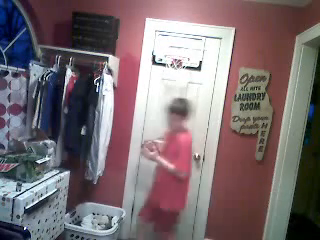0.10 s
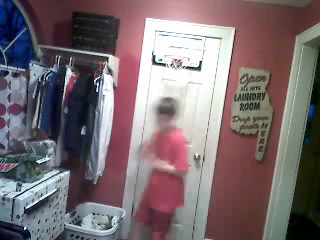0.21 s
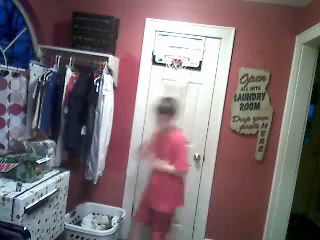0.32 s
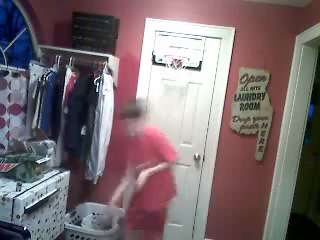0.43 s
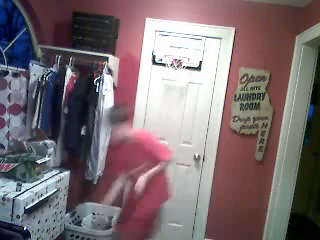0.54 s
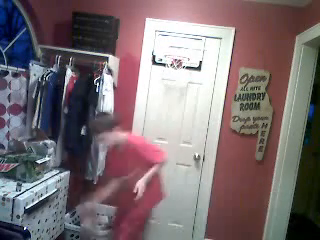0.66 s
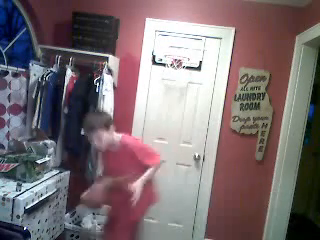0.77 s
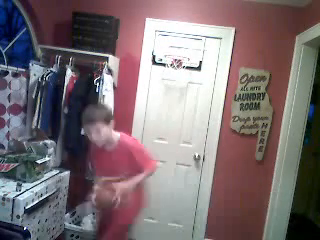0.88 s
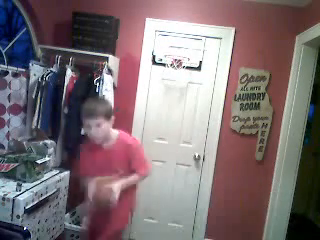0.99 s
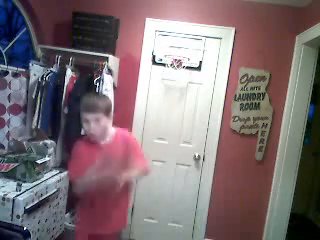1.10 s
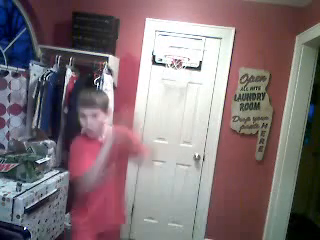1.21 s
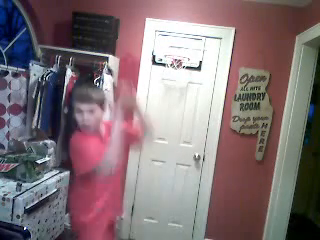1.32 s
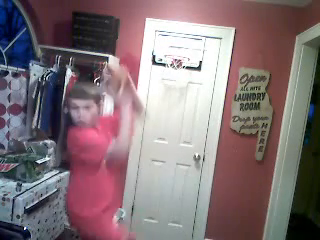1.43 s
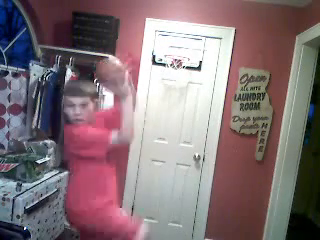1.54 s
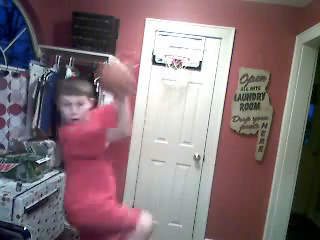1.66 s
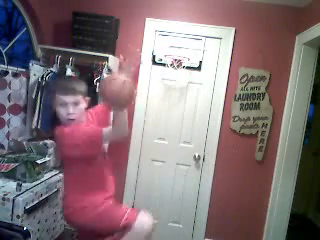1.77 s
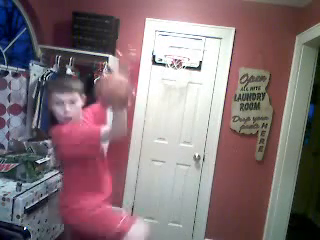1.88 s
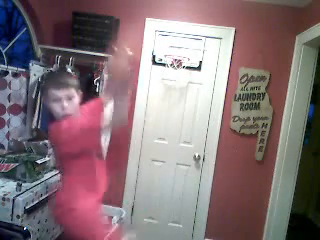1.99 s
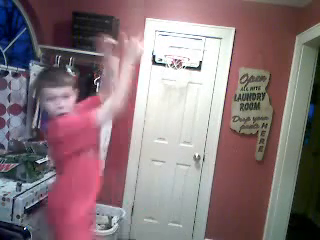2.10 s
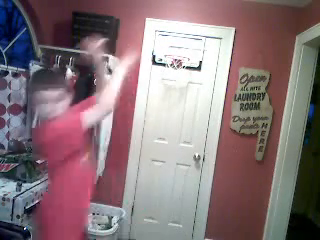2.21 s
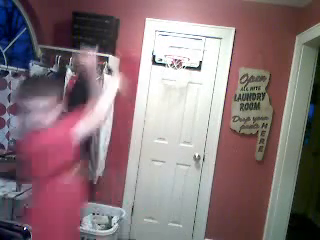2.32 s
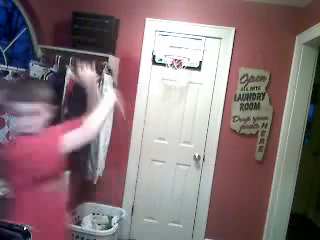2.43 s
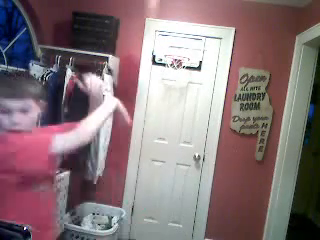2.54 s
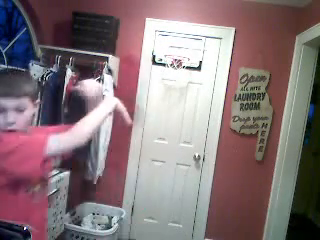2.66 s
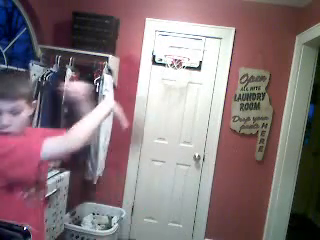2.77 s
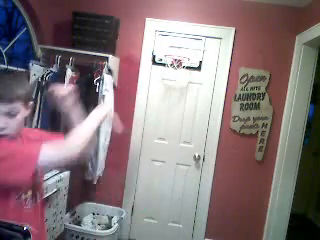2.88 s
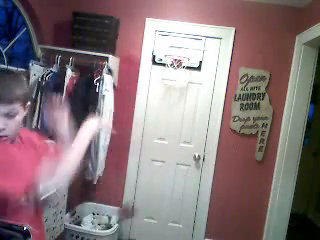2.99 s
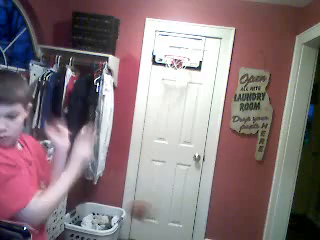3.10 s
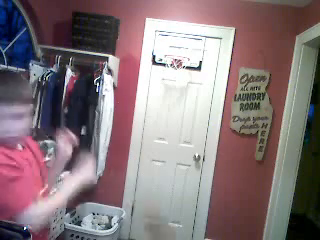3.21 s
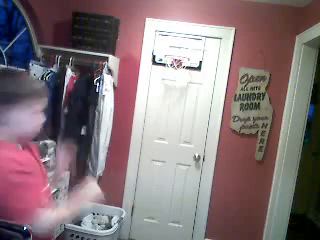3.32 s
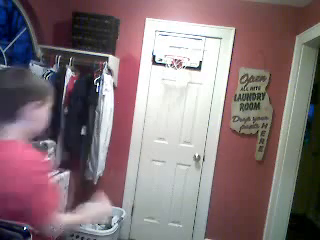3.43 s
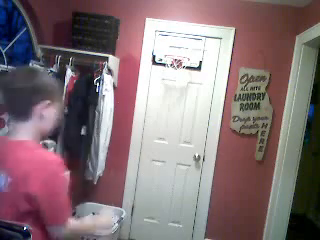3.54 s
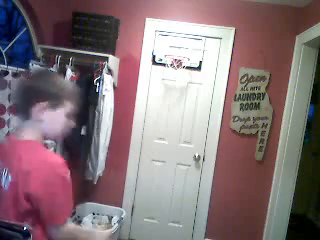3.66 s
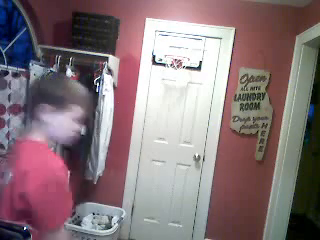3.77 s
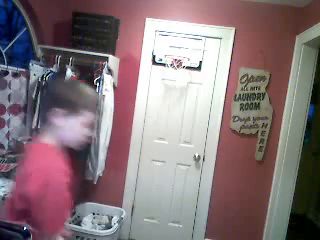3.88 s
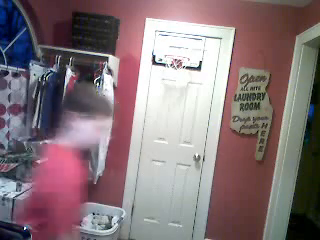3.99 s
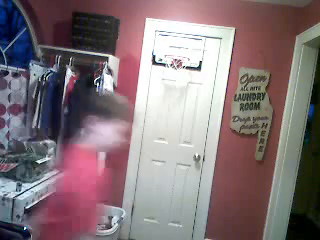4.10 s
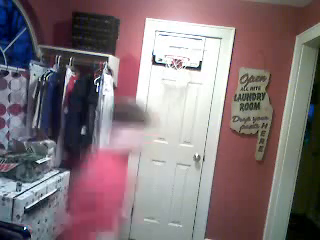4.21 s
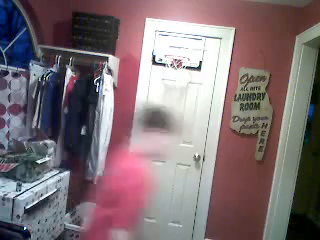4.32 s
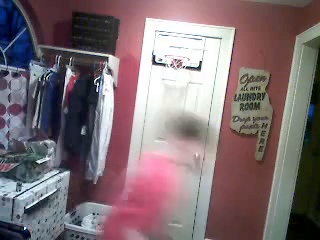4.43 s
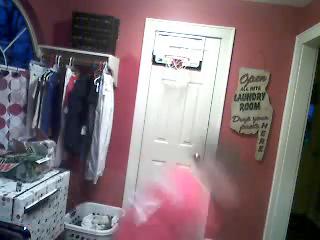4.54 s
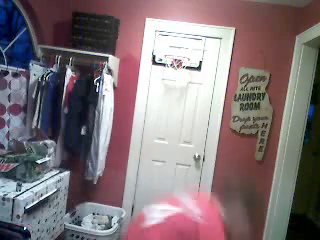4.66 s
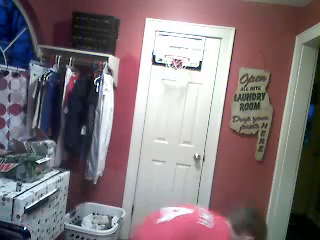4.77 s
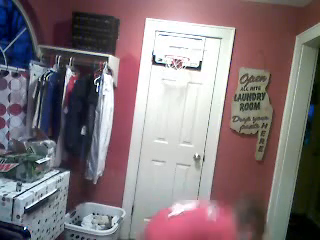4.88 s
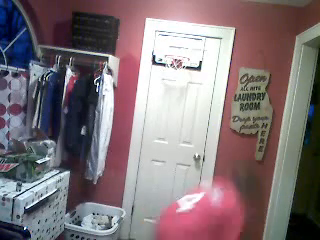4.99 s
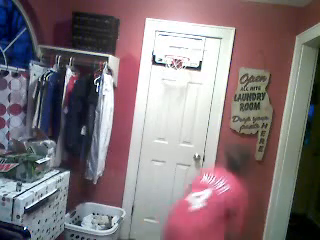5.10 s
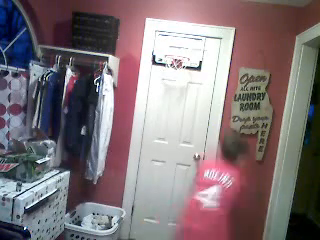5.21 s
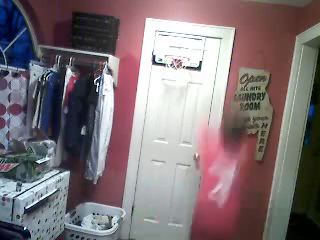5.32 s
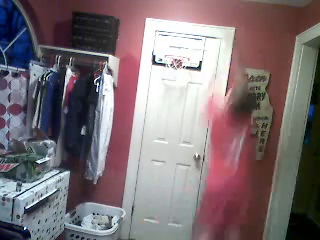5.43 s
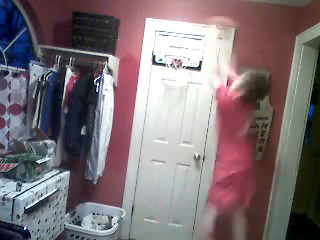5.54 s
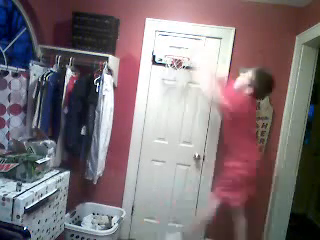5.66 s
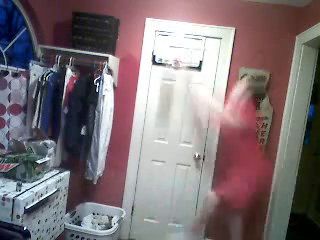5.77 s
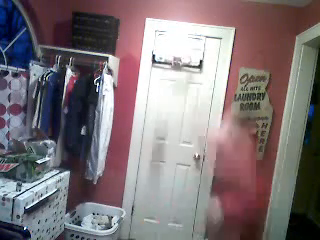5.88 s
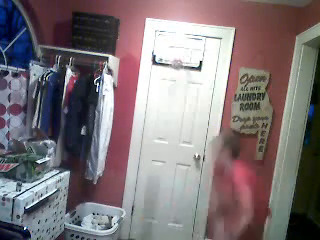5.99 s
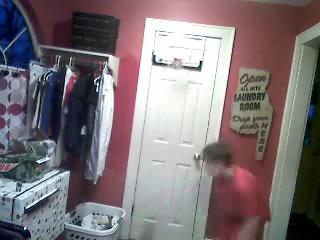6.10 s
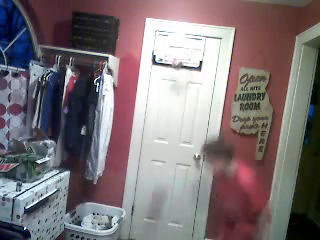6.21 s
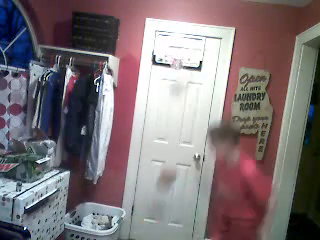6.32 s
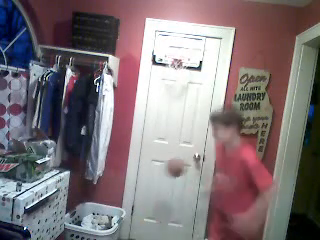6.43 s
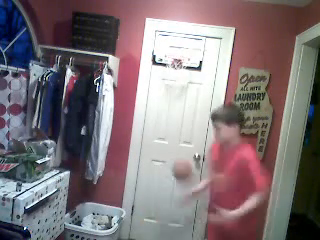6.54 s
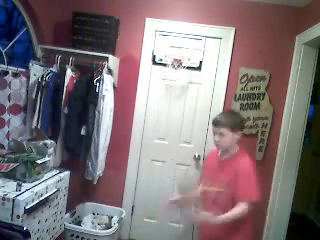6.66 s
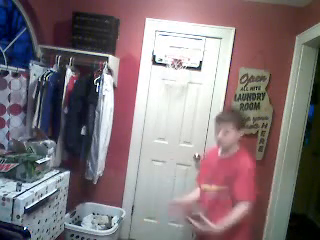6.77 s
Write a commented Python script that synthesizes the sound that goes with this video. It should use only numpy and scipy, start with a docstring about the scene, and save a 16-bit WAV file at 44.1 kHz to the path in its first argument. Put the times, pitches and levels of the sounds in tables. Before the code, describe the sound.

A small, hard, lively room with a wooden floor, heard through a cheap fixed microphone with faint hiss and mains hum. A low footfall comes at 0.3 s, and a rubber ball slaps with a round thump at about 0.5 s. A soft foot thud follows at 0.85 s, then relative quiet until light knocks at 2.3 s and bounces at 2.8 and 2.95 s. Around 3.45 s a rapid cluster of heavy blows hits a sheet-metal appliance: loud bang, hollow ping, harsh rattle, and a deep boom lingering over a second. Footfalls and duller bounces continue from 3.7 to 4.85 s, with slight cloth rustle near 4.1 and 5.4 s. From 5.7 s a mini hoop shakes, board and loose parts clattering, door swaying, rim squeaking briefly upward at 5.9 s; a strong hit lands at 6.07 s. Rattling and footfalls thin out to tiny ticks by 6.8 s.

```python
"""Small hard room, wooden floor: steady microphone hiss (coloured noise) and mains hum (sine); feet thud throughout.
From 0.4 s a small rubber ball slaps floor and hands: noise bursts over dying floor and room modes.
At 3.45 s it bangs a sheet-metal appliance, whose panel modes boom on; more bounces follow.
From 5.7 s it shakes a mini hoop: board and loose panels rattle (trains of knocks through modes), a door sways,
loose parts chatter in random clicks, the rim squeaks in gliding partials, and the rattle dies away."""
import sys
import numpy as np
from scipy import signal
from scipy.fft import rfft, irfft, next_fast_len
from scipy.io import wavfile
from scipy.ndimage import uniform_filter1d

SR = 44100
rng = np.random.default_rng(int(sys.argv[2]) if len(sys.argv) > 2 else 0)


def makeup_ratio(level_db):
    """Linear amplitude ratio for a level in decibels (20 dB per factor of ten)."""
    decades = np.asarray(level_db, float) / 20
    return 10 ** decades


def inscribe(sig):
    """Save sig as 16-bit PCM at rate SR to the path in sys.argv[1].

    A 1-D sig is mono; a 2-D sig holds one channel per row.
    Samples are clipped to [-1, 1] before scaling.
    """
    pcm = np.round(np.clip(np.atleast_2d(sig).T, -1, 1) * 32767)
    wavfile.write(sys.argv[1], SR, pcm.astype(np.int16))


N = 302526


def evened(x):
    """Scales to rms 1."""
    return x / np.sqrt(np.mean(x ** 2) + 1e-20)


def add(mix, time_s, sound):
    """Mixes a sound in at time_s."""
    part = mix[round(time_s * SR):][:len(sound)]
    part += sound[:len(part)]


def coloured(x, points):
    """Filters x by a spectrum of (frequency [Hz], gain [dB])."""
    size = next_fast_len(len(x))
    hz, db = np.transpose(points)
    bins_hz = np.fft.rfftfreq(size, 1 / SR)
    gain = makeup_ratio(np.interp(np.log(bins_hz + 1), np.log(hz + 1), db))
    return irfft(rfft(x, size) * gain, size)[:len(x)]


def like_strength(ring):
    """Scales by the energy of the first 45 ms."""
    return ring / np.sqrt(np.mean(ring[:2000] ** 2) * 6)


def struck(modes, rise_s, smear, count=4, size=22000):
    """Dying modes after a soft blow; with count > 1 each is a crowd of close neighbours that beat and blur."""
    hz, db, t60_s = np.repeat(np.transpose(modes), count, axis=1)[:, :, None]
    detune = 1 + smear * rng.standard_normal((len(hz), 1))
    phase = rng.random((len(hz), 1)) * (count > 1)  # lone modes all start with the push
    t = np.arange(0, size, 4) / SR  # low modes: a quarter rate suffices
    ring = makeup_ratio(db - 60 * t / t60_s) * np.sin(2 * np.pi * (hz * detune * t + phase))
    ring = ring.sum(0) * (1 - np.exp(-(t / rise_s) ** 2))
    return like_strength(signal.resample_poly(ring, 4, 1))


def puff(points, t60_s, rise_s):
    """A short burst of coloured noise, peak near 1."""
    t = np.arange(8000) / SR
    noise = evened(coloured(rng.standard_normal(len(t)), points))
    return noise * makeup_ratio(-60 * t / t60_s) * (1 - np.exp(-t / rise_s))


def chime(hz, glide_hz_per_s, t60_s):
    """Six close partials that beat and die, gliding in pitch if asked."""
    t = np.arange(12000) / SR
    detune, phase = 1 + 0.028 * rng.standard_normal((6, 1)), rng.random((6, 1))
    turns = hz * detune * t + glide_hz_per_s * t ** 2 / 2 + phase
    ring = np.sin(2 * np.pi * turns).sum(0)
    return like_strength(ring * makeup_ratio(-60 * t / t60_s) * (1 - np.exp(-t / 0.006)))


def shaking(hold_s, t60_s):
    """Envelope of a jolt: quick rise, hold, then dying away."""
    t = np.arange(16000) / SR
    rise = 1 - np.exp(-t / 0.005)
    return rise * makeup_ratio(-60 * np.maximum(t - hold_s, 0) / t60_s)


# hiss spectrum: (frequency [Hz], relative density [dB per Hz])
HISS_SPECTRUM = [(15, -2), (30, 8), (90, -1.5), (300, -7), (500, -10.5), (1500, -17), (5000, -22),
                 (9000, -23.5), (10500, -34), (13000, -32)]
HISS_RMS_DB = -70


def hiss():
    """Microphone hiss: steady coloured noise."""
    return makeup_ratio(HISS_RMS_DB) * evened(coloured(rng.standard_normal(N), HISS_SPECTRUM))


# mains hum: (frequency [Hz], level [dB rms])
MAINS = (59.8, -70)


def hum():
    """Mains hum: one steady sine."""
    hz, rms_db = MAINS
    return makeup_ratio(rms_db) * np.sqrt(2) * np.sin(2 * np.pi * (hz * np.arange(N) / SR + rng.random()))


# room decay: (frequency [Hz], t60 [s])
ROOM_DECAY = [(100, 0.48), (500, 0.44), (1500, 0.45), (5000, 0.37), (10000, 0.35)]


def room(x):
    """Three tails of sparse random taps, each band dying at its own speed; the source drifts among them."""
    at = np.arange(200, SR // 2 - 20, 20)
    at = at + rng.integers(0, 20, (3, len(at)))
    taps = np.zeros((3, SR // 2))
    np.put_along_axis(taps, at, rng.choice([-1., 1.], at.shape), 1)
    hz, t, bands = signal.stft(taps, SR, nperseg=512)
    decay_hz, decay_s = np.transpose(ROOM_DECAY)
    t60_s = np.interp(np.log(hz + 1), np.log(decay_hz), decay_s)[:, None]
    tails = signal.istft(bands * makeup_ratio(-60 * t / t60_s), SR, nperseg=512)[1]
    tails = tails / np.linalg.norm(tails[0])
    turn = 2 * np.pi * (7 * np.arange(N) / SR + np.arange(3)[:, None] / 3)  # 7 Hz, three phases
    wet = signal.fftconvolve(x * np.cos(turn) * np.sqrt(2 / 3), tails, axes=1).sum(0)[:N]
    return signal.lfilter(*signal.butter(2, 250, "high", fs=SR), wet)  # the lowest modes ring in the tables


# cloth brushing: (time [s], level [dB])
RUSTLES = [(4.11, -66.5), (5.41, -70)]


def cloth():
    """Cloth rustles: soft-edged puffs of noise."""
    out = np.zeros(N)
    for time_s, db in RUSTLES:
        add(out, time_s, makeup_ratio(db) * puff([(800, -16), (2800, -3), (7500, -5), (11000, -15.5)], 0.37, 0.03))
    return out


# footfalls: (time [s], level [dB], pitch [Hz], t60 [s])
FOOTFALLS = [(0.276, -39.5, 61.4, 0.14), (0.33, -50, 55, 0.18), (0.851, -42.5, 68.6, 0.11),
             (2.258, -55, 164, 0.23), (2.398, -48.5, 55.5, 0.4), (2.47, -48, 34.2, 0.35),
             (2.83, -38.5, 35, .5), (3.718, -29.5, 140, 0.13), (4.099, -34, 119, .2),
             (4.51, -38.5, 56, 0.25), (4.774, -38, 46, 0.13), (5.218, -55, 145.2, 0.21),
             (5.4, -52.5, 32.6, .2), (6.261, -36, 65.4, 0.24), (6.427, -42, 32.8, 0.42),
             (6.599, -44, 48, 0.31)]
# board modes under a foot: (multiple of the pitch [ratio], level [dB])
FOOT_MODES = [(1, 0), (1.3, -7), (1.8, -14)]
SCUFF_DB, SCUFF_LATE_S = -18.5, 0.015  # re thud


def feet():
    """Each footfall pushes the boards at one low pitch and scuffs a little."""
    out = np.zeros(N)
    scuff = [(150, 1), (350, -2.5), (1100, -11.5), (1600, -23), (9000, -30), (11000, -72)]  # (Hz, dB)
    for time_s, db, hz, t60_s in FOOTFALLS:
        modes = [(hz * ratio, mode_db, t60_s) for ratio, mode_db in FOOT_MODES]
        add(out, time_s, makeup_ratio(db) * struck(modes, 0.011, 0.012, count=1))
        add(out, time_s + SCUFF_LATE_S, makeup_ratio(db + SCUFF_DB) * puff(scuff, 0.22, 0.0067))
    return out


# door leaf resonances: (frequency [Hz], width [Hz], level [dB])
LEAF_MODES = [(30, 27, 0.5), (45, 37, -6.5), (66, 110, -3)]
# door swaying on its latch: (time [s], level [dB])
SWAY_LEVEL = [(5.67, -46.5), (5.804, -33), (6.034, -37.5), (6.086, -26), (6.162, -47.5), (6.258, -33.5),
              (6.52, -59.5), (6.622, -56), (6.85, -75)]


def door():
    """The door leaf sways: noise through low double resonators, under a level curve."""
    push = rng.standard_normal(N)
    sway = np.zeros(N)
    for hz, width_hz, db in LEAF_MODES:
        r = np.exp(-np.pi * width_hz / SR)
        poles = [1, -2 * r * np.cos(2 * np.pi * hz / SR), r * r]
        once = signal.lfilter([1, -1], poles, push)
        sway += makeup_ratio(db) * evened(signal.lfilter([1, -1], poles, once))
    time_s, sway_db = np.transpose(SWAY_LEVEL)
    curve_db = np.interp(np.arange(N) / SR, time_s, sway_db, -120, -120)
    return uniform_filter1d(makeup_ratio(curve_db), size=400) * evened(sway)


# jolts, also played by jolt_ticks() and rattle():
# (time [s], rattle level [dB], hold [s], upper re lower modes [dB], chatter level [dB])
JOLTS = [(0.889, -63.5, 0.0064, 13, -62), (2.35, -54, 0.0056, -8, -66), (3.452, -36.5, 0.034, 2, -59),
         (3.505, -29.5, 0.032, 4, -38.5), (3.545, -31, 0.031, 0.5, -47), (4.844, -62.5, 0.0092, -17, -64),
         (5.687, -35, 0.039, 3.5, -41.5), (5.762, -30, 0.02, -5.5, -44), (5.796, -32, 0.025, -7, -44),
         (5.847, -52, 0.027, 0, -51), (5.9, -50, 0.013, 1, -48), (5.945, -37, 0.034, -3.5, -55),
         (5.985, -35.5, 0.02, 2.5, -44.5), (6.078, -36, 0.021, -7.5, -71), (6.122, -37, 0.022, -6.5, -52),
         (6.171, -53.5, 0.067, 2, -71), (6.21, -34.5, 0.012, 2.5, -53), (6.222, -33.5, 0.016, -10, -56),
         (6.265, -46.5, 0.029, -5, -54), (6.335, -42, 0.0075, -1, -61.5), (6.385, -56, 0.012, -12, -79),
         (6.462, -56.5, 0.018, -5, -77), (6.444, -71, 0.026, 8, -72), (6.563, -62, 0.013, -6, -79),
         (6.592, -49.5, 0.0059, -7, -75), (6.68, -63, 0.024, -10, -72.5), (6.745, -73.5, 0.13, 0, -80.5)]
CHATTER_T60_S, BRIGHT_DB, CLICKS_PER_S = 0.19, -8.0, 1500


def chatter():
    """After each jolt loose parts chatter in dense, clumped random clicks, dull and bright."""
    size_db = 2.0 * np.minimum(rng.exponential(1, (2, N)), 5)
    clump_db = 1.6 * evened(uniform_filter1d(rng.standard_normal(N), size=500))
    hits = (rng.random((2, N)) < CLICKS_PER_S / SR) * rng.choice([-1, 1], (2, N))
    clicks = hits * makeup_ratio(size_db + clump_db)
    dull = evened(coloured(clicks[0], [(900, -26), (1600, 0), (4400, -7), (5200, -3.5), (13000, -26.5)]))
    bright = evened(coloured(clicks[1], [(3500, -20.5), (5000, -13), (8000, 6.5), (10000, -5), (13000, -16)]))
    power = np.zeros(N)
    for time_s, _, hold_s, _, chatter_db in JOLTS:
        add(power, time_s, (makeup_ratio(chatter_db) * shaking(hold_s, CHATTER_T60_S)) ** 2)
    return np.sqrt(power) * (dull + makeup_ratio(BRIGHT_DB) * bright)


# jolt tick spectrum: (frequency [Hz], relative density [dB per Hz])
JOLT_TICK_SPECTRUM = [(400, -22.5), (1200, -6), (1700, -0.5), (2400, -8), (5000, -10), (11000, -22)]
JOLT_TICK_DB, JOLT_TICK_LATE_S = 1, 0.003  # re chatter level and jolt


def jolt_ticks():
    """Loose parts tick at each jolt: a noise puff."""
    out = np.zeros(N)
    for time_s, _, _, _, chatter_db in JOLTS:
        tick = puff(JOLT_TICK_SPECTRUM, 0.093, 0.006)
        add(out, time_s + JOLT_TICK_LATE_S, makeup_ratio(chatter_db + JOLT_TICK_DB) * tick)
    return out


# pitched ticks of small hard parts: (time [s], level [dB], pitch [Hz])
TICKS = [(0.403, -56.5, 2510), (0.893, -56.5, 2580), (2.35, -55.5, 5200), (2.352, -58, 3240),
         (3.507, -30.5, 6760), (4.083, -56, 3050), (5.807, -35.5, 3140), (5.979, -46, 5600),
         (6.075, -29.5, 6960), (6.34, -71, 4500), (6.445, -68, 3480), (6.601, -72, 3900), (6.69, -72, 2700),
         (6.744, -69, 2900), (6.775, -74, 4340), (6.83, -75, 3300)]


def ticks():
    """Short puffs of noise gathered round one pitch."""
    out = np.zeros(N)
    for time_s, db, hz in TICKS:
        peak = [(hz * 0.2, -30), (hz * 0.75, -13), (hz, 0), (hz * 1.5, -13), (hz * 4.9, -28)]
        add(out, time_s, makeup_ratio(db) * puff(peak, 0.12, 0.0019))
    return out


# hollow parts that ring at one pitch: (time [s], level [dB], pitch [Hz])
PINGS = [(0.404, -60, 1185), (2.345, -48.5, 865), (2.345, -65, 1620), (2.803, -57.5, 993),
         (3.507, -24, 1120), (6.685, -59, 768)]


def pings():
    """Hollow parts ring in close partials that beat and die."""
    out = np.zeros(N)
    for time_s, db, hz in PINGS:
        add(out, time_s, makeup_ratio(db) * chime(hz, 0, t60_s=0.2))
    return out


# squeaks of the springy rim: (time [s], level [dB], start pitch [Hz], glide [Hz per s])
SQUEAKS = [(5.901, -47, 4180, 1970), (5.978, -58, 5550, 9200)]


def squeaks():
    """The springy rim squeaks: short clusters of partials gliding upward."""
    out = np.zeros(N)
    for time_s, db, hz, glide_hz_per_s in SQUEAKS:
        add(out, time_s, makeup_ratio(db) * chime(hz, glide_hz_per_s, t60_s=0.088))
    return out


# lower modes of board and panels: (frequency [Hz], level [dB], t60 [s])
RATTLE_LOW = [(564, -15, 0.011), (600.4, -3.5, 0.076), (664, -0.5, 0.046), (710, 3, 0.021),
              (790.6, -5.5, 0.026)]
# upper modes of board and panels: (frequency [Hz], level [dB], t60 [s])
RATTLE_HIGH = [(989, 1.5, 0.056), (1026, -2.5, 0.073), (1099.7, -4.5, 0.16), (1163.5, -4, 0.025),
               (1283, -9.5, 0.022), (1496, -12, 0.035), (1746, -20, 0.03)]
RATTLE_PER_S, RATTLE_T60_S, LEAD_DB = 130, 0.1, 1.5


def rattle():
    """At each jolt the board or loose panels knock hard, then many times more, ringing in two mode clusters."""
    out = np.zeros(N)
    for time_s, db, hold_s, upper_db, _ in JOLTS:
        shake = shaking(hold_s, RATTLE_T60_S)
        clusters = (RATTLE_LOW, -upper_db / 2), (RATTLE_HIGH, upper_db / 2)
        for modes, side_db in clusters * 2:  # two spots of contact
            place = (np.arange(100) + rng.random(100)) * SR / RATTLE_PER_S
            strength = makeup_ratio(2.13 * rng.standard_normal(100))
            knocks = np.bincount(place.astype(int), strength, 16000)[:len(shake)] * shake
            knocks[150] += makeup_ratio(LEAD_DB)  # the hard knock, 3.4 ms in
            ring = struck(modes, 0.00086, 0.05, count=3, size=6000)
            ring = ring / np.linalg.norm(ring) * np.sqrt(SR / RATTLE_PER_S / 4)
            add(out, time_s, makeup_ratio(db + side_db) * signal.fftconvolve(knocks, ring))
    return out


# sheet-metal side modes: (frequency [Hz], level [dB], t60 [s])
PANEL_MODES = [(33.4, -4.5, 1.1), (63.2, 2.5, 0.93), (109, -9.5, 0.52), (122.7, 0, 1.2), (140, -13.5, 2.3),
               (169.4, -3.5, 0.4), (220.2, -9.5, 1.6), (247, 2, 0.76), (271, -5.5, 0.75), (322.6, -11, 1.3),
               (389, -16, 1.1), (450, -16.5, 0.78), (518, -6.5, 0.86), (667, -19, 0.56), (734, -16.5, 1.3),
               (833, -21, 0.76), (922, -15, 0.892), (1175, -14, 0.59), (1300, -24.5, 0.93)]
PANEL_S, PANEL_DB = 3.452, -18.5


def sheet_metal():
    """The appliance's side booms on after a hard blow: long, blurred modes."""
    out = np.zeros(N)
    add(out, PANEL_S, makeup_ratio(PANEL_DB) * struck(PANEL_MODES, 0.016, 0.09, count=14, size=60000))
    return out


# ball blows: (time [s], slap [dB], deep boom [dB], floor drum [dB], ring [dB])
BLOWS = [(0.396, -53, -55, -60, -65), (0.5186, -33, -28, -25.5, -34.5), (0.8928, -76, -55, -58, -56),
         (2.3377, -64, -38, -41.5, -55), (2.8025, -49.5, -37, -38.5, -49.5),
         (2.9631, -33.5, -21, -31.5, -35.5), (3.4459, -40.5, -16.5, -19.5, -47),
         (3.4738, -35, -16, -18.5, -53), (3.4921, -31, -22, -28, -26), (3.7316, -42, -32, -34.5, -49.5),
         (4.0821, -57, -35, -27.5, -54), (4.2791, -48, -36.5, -31.5, -50.5),
         (4.6453, -49.5, -39, -32.5, -61), (4.813, -57.5, -53, -39.5, -70), (4.845, -57, -53.5, -58, -57),
         (5.685, -43, -44, -45, -34), (5.8113, -58, -32, -29.5, -42.5), (6.064, -36.5, -45, -56, -55),
         (6.0742, -31.5, -18.5, -24.5, -34)]
# slap spectrum: (frequency [Hz], relative density [dB per Hz])
SLAP_SPECTRUM = [(700, -27), (1300, -7), (1800, -7), (3000, -1.5), (4200, -4), (6000, -4.5), (8000, -2),
                 (9500, -9), (10500, -15), (13000, -5.5)]
# floor and room modes, four families: (frequency [Hz], level [dB], t60 [s])
DEEP_MODES = [(37, -21, 0.67), (64.3, 3.5, 0.27), (74.1, -6, 0.25)]
DRUM_MODES = [(117.1, 1.5, 0.22), (129.3, 3.5, 0.23), (168.7, -3, 0.2)]
KNOCK_MODES = [(241, -1, 0.12), (283.2, 3, 0.11), (303.4, 0, 0.09), (343, -4.5, 0.22), (416, -1, 0.1)]
RING_MODES = [(515.6, -8, 0.12), (642, 3, 0.07), (772, 4, 0.063), (893, 4.5, 0.045), (957, -5, 0.029),
              (1057, -11, 0.26), (1159, -10, 0.2), (1327, -22.5, 0.042)]
KNOCK_DB = -2  # re mean of drum and ring
ONSET_EARLY_S, ONSET_DB = 0.0073, -10  # re slap


def ball():
    """Rubber slaps with a soft onset, a weak noise puff, then the full one; floor and room ring in four families."""
    out = np.zeros(N)
    for time_s, slap_db, deep_db, drum_db, ring_db in BLOWS:
        knock_db = (drum_db + ring_db) / 2 + KNOCK_DB
        onset = puff(SLAP_SPECTRUM, 0.1, 0.00292)
        add(out, time_s - ONSET_EARLY_S, makeup_ratio(slap_db + ONSET_DB) * onset)
        add(out, time_s, makeup_ratio(slap_db) * puff(SLAP_SPECTRUM, 0.19, 0.0016))
        add(out, time_s, makeup_ratio(deep_db) * struck(DEEP_MODES, 0.012, 0.075, count=1))
        add(out, time_s, makeup_ratio(drum_db) * struck(DRUM_MODES, 0.0061, 0.035, count=1))
        add(out, time_s, makeup_ratio(knock_db) * struck(KNOCK_MODES, 0.0069, 0.06))
        add(out, time_s, makeup_ratio(ring_db) * struck(RING_MODES, 0.0089, 0.05))
    return out


def scene():
    """All sources, their room, and the noise floor."""
    dry = cloth() + feet() + door() + chatter() + jolt_ticks() + ticks() + pings() + squeaks()
    dry += rattle() + sheet_metal() + ball()
    return (dry + makeup_ratio(-5.0) * room(dry) + hiss() + hum())[None]


def roll_off(x):
    """The treble ends steeply here."""
    return signal.sosfilt(signal.butter(12, 12340, fs=SR, output="sos"), x)


# top of the band: (frequency [Hz], gain [dB])
BAND_TOP = [(10680, 0), (10760, -45), (11250, -45), (11370, -14), (11800, -17), (12300, -26), (12400, -50)]


def record(dry):
    """The band ends in a gap and a weak strip above it."""
    mix = coloured(dry[0], BAND_TOP)[None]
    return roll_off(mix)


dry = scene()
out = record(dry)
inscribe(out)
```